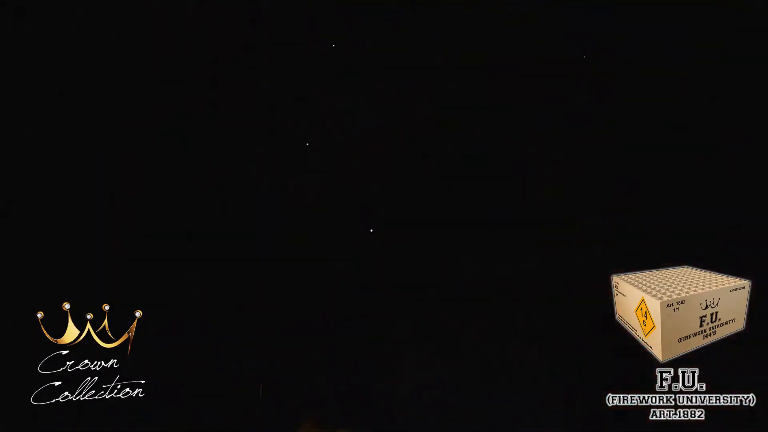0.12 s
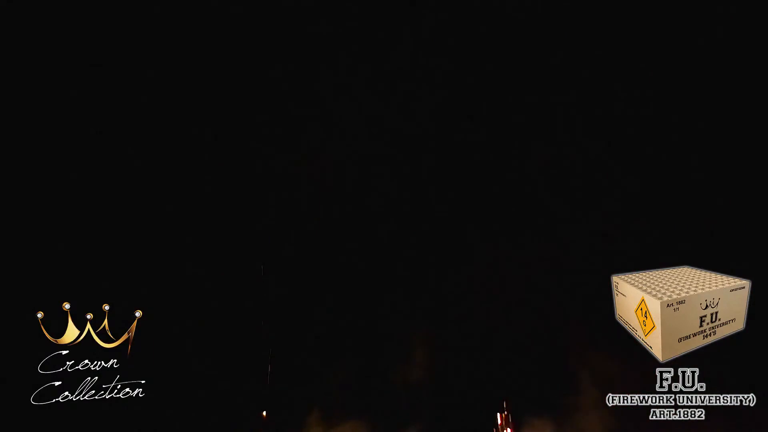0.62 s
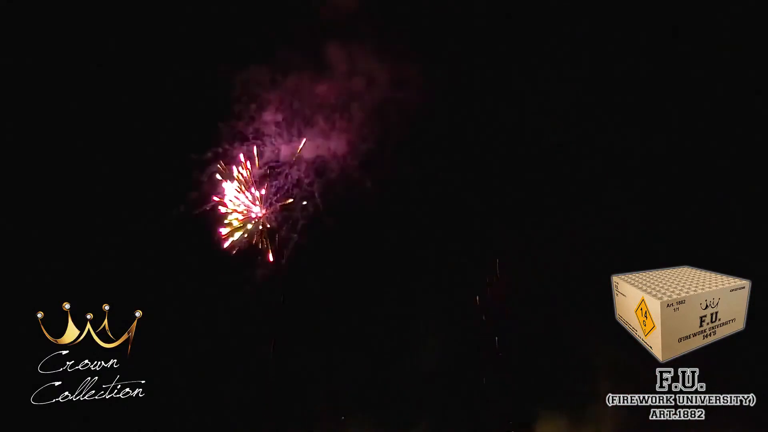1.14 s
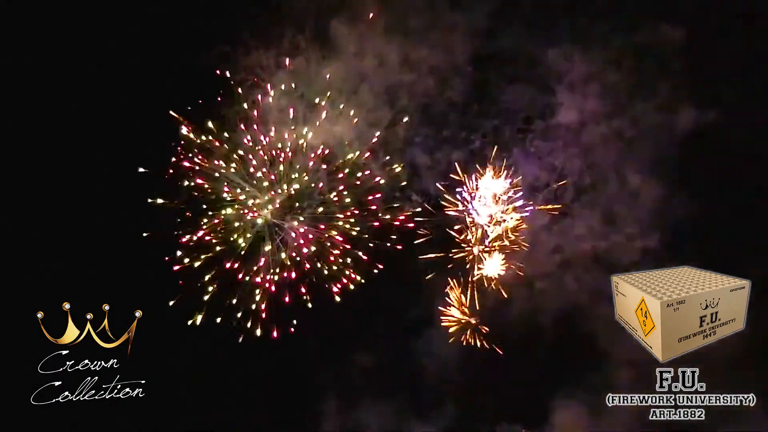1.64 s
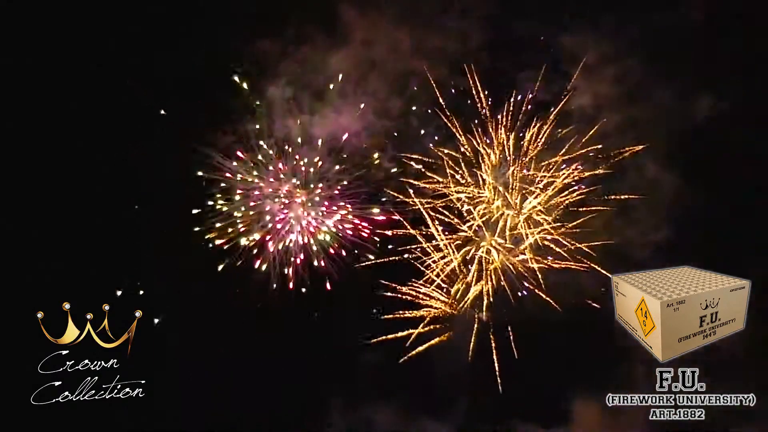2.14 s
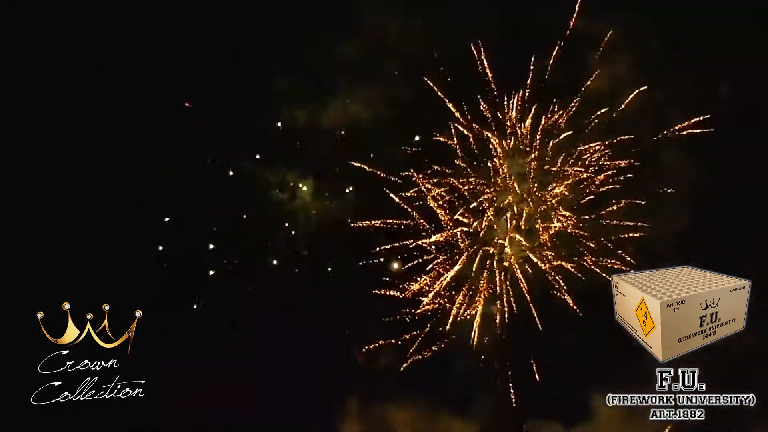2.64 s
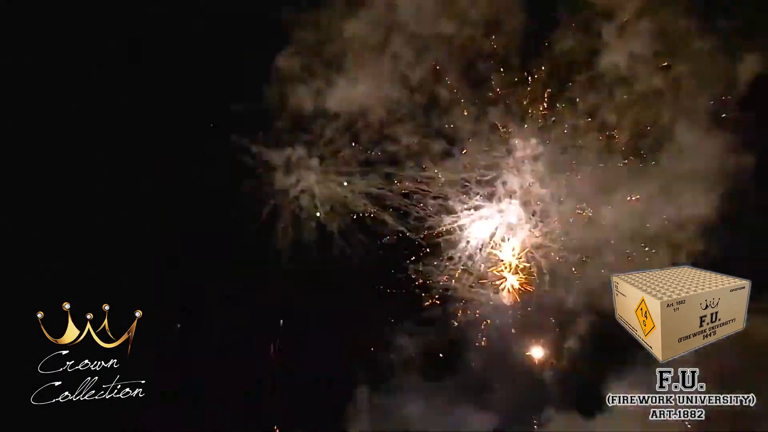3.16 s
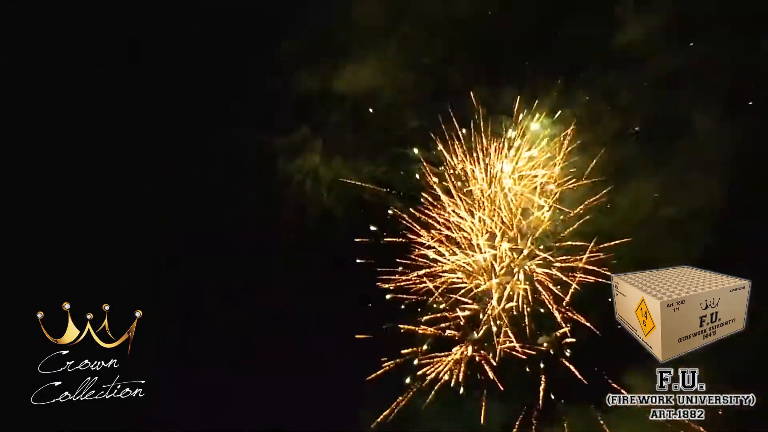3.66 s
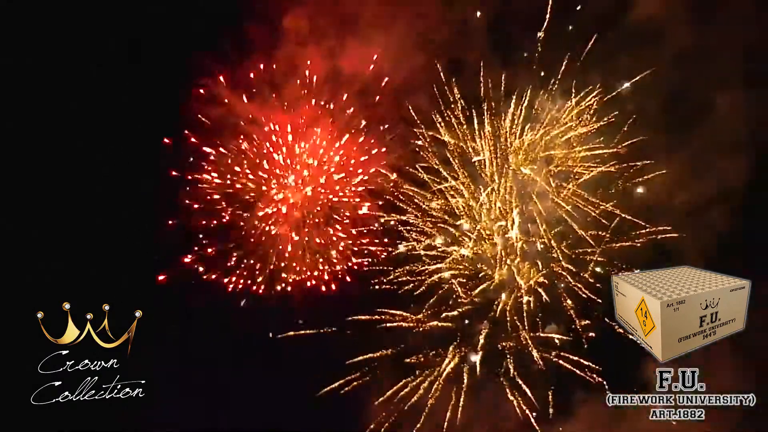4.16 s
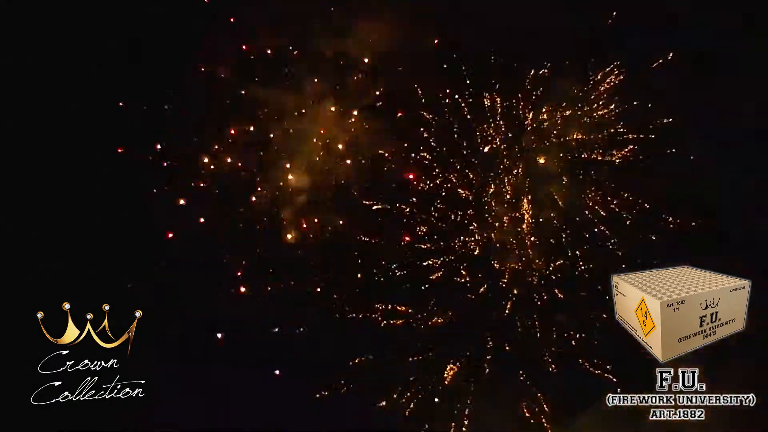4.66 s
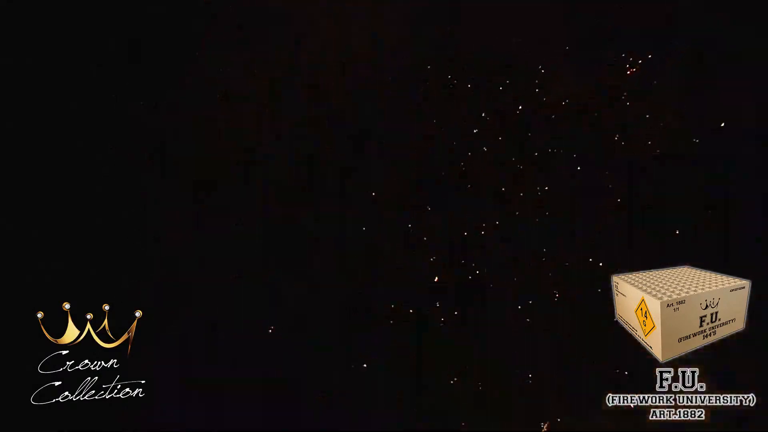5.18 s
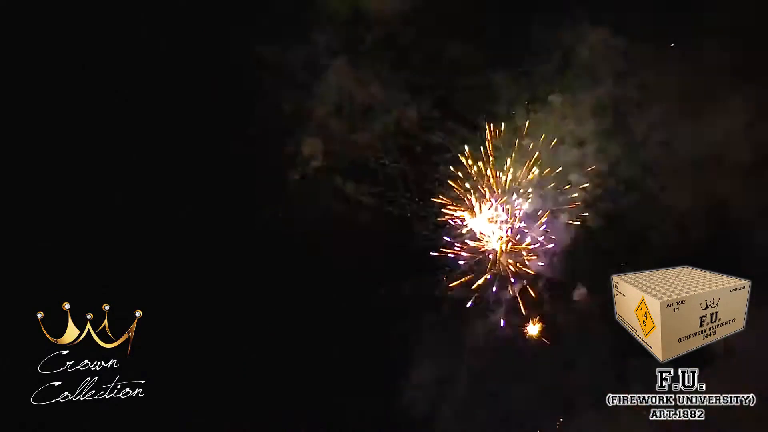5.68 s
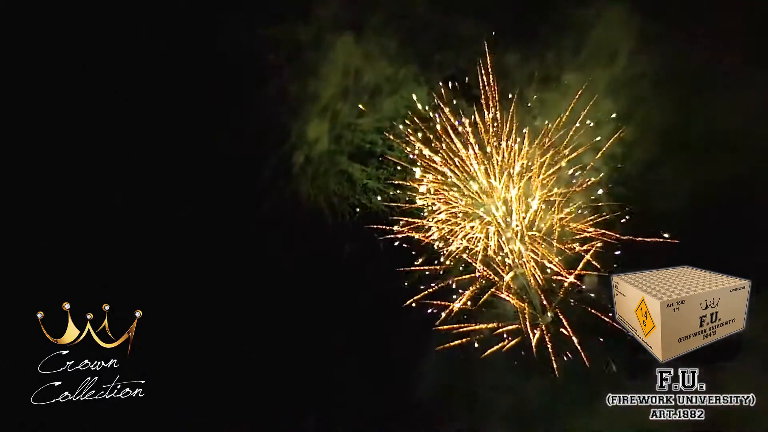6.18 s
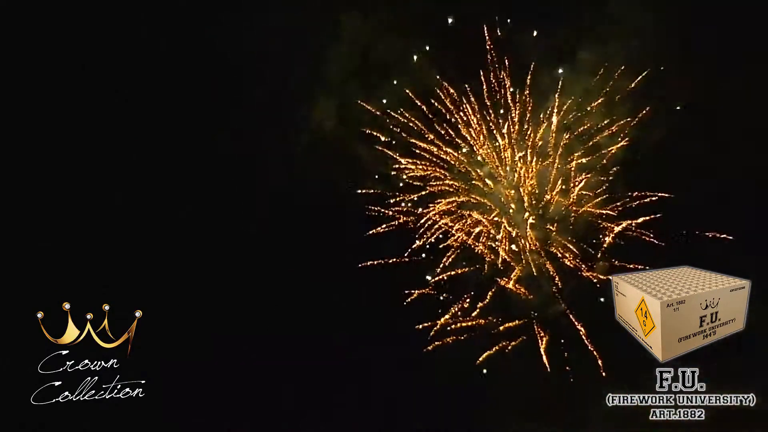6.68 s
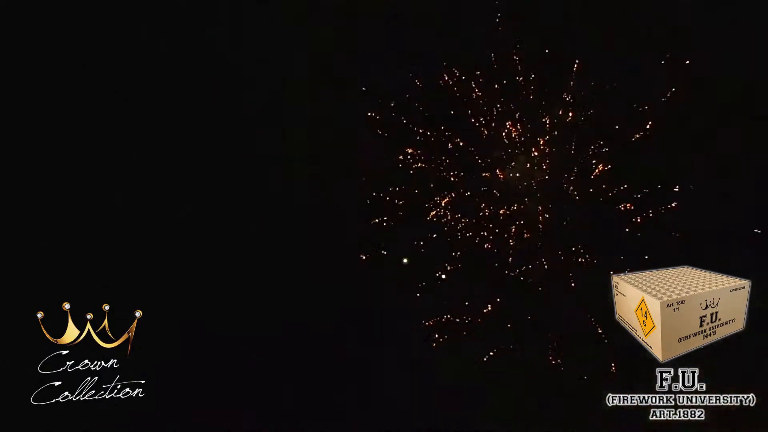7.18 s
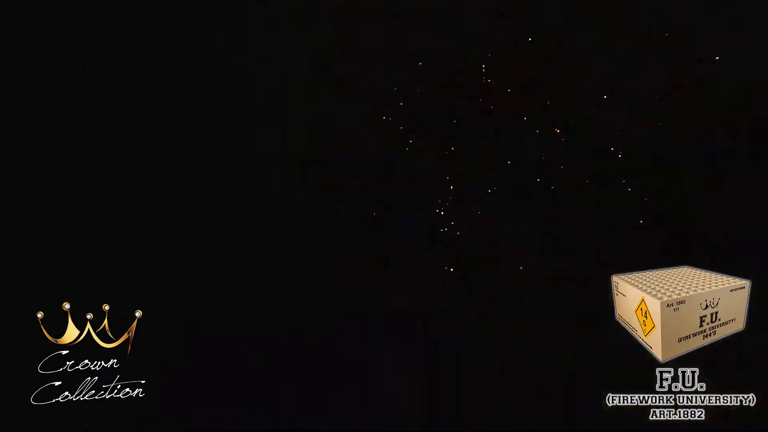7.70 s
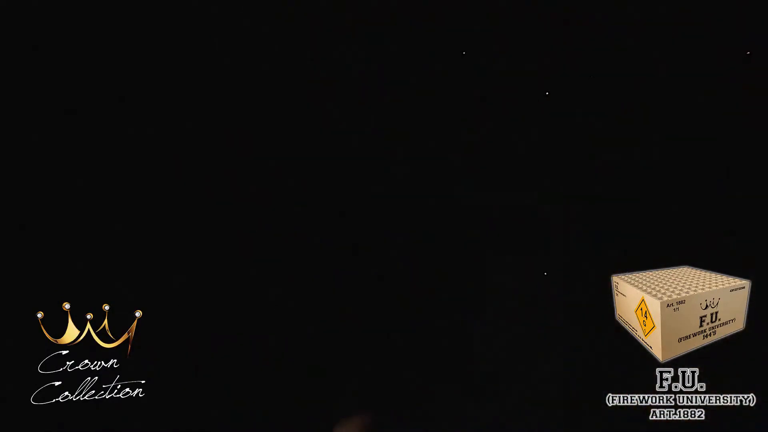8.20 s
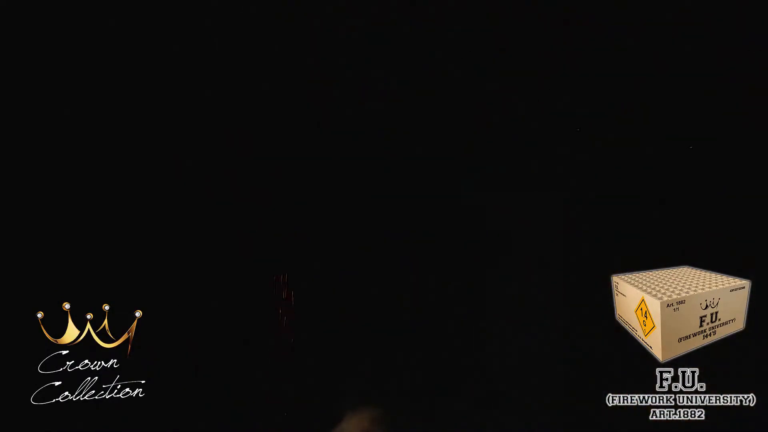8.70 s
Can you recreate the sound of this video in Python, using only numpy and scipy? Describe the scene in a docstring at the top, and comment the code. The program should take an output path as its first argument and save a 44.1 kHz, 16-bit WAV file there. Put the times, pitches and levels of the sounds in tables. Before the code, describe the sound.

Outdoors at night, a firework battery thumps out shells in rapid rows. Seconds later they burst overhead in dense, hard bangs that overload the microphone. Crackling stars follow the first two volleys, and echoes roll off walls and houses. A third volley bangs with hardly any crackle, then rumble fades to faint traffic and breeze before one more row of launches.

```python
"""Firework cake at night

Shells burst overhead, tubes thump as they launch, crackling stars pop; the input overloads on the bangs.
Each bang is a short pressure front followed by damped sine swings.
The ground and walls throw the bangs back as delayed, smeared copies, and the district
rumbles after them in noise bands that decay. Below lie filtered noises for a breeze and distant traffic.
"""
import sys
import numpy as np
from scipy import signal
from scipy.fft import rfft, irfft
from scipy.io import wavfile

SR = 44100
rng = np.random.default_rng(int(sys.argv[2]) if len(sys.argv) > 2 else 0)


def voltage_ratio(decibels):
    """Convert decibels (scalar or array-like) to amplitude ratios, 20 dB per decade."""
    exponent = np.asarray(decibels, float) / 20
    return 10 ** exponent


def to_wav(sig):
    """Store sig (one row per channel, or 1-D mono) as 16-bit WAV at the path in sys.argv[1].

    Samples outside -1..1 are clipped; the rate is SR.
    """
    pcm = np.clip(np.atleast_2d(sig), -1, 1) * 32767
    pcm = np.round(pcm).astype(np.int16)
    wavfile.write(sys.argv[1], SR, pcm.T)  # frames by channels


N = 389403  # samples


def band(x, hz, octaves):
    """Band-pass centred on hz."""
    edges = hz * 2. ** (np.array([-.5, .5]) * octaves)
    return signal.sosfilt(signal.butter(2, edges, "band", fs=SR, output="sos"), x)


def soften(x, hz):
    """Low-pass that dulls everything above hz."""
    return signal.sosfilt(signal.butter(2, hz, fs=SR, output="sos"), x)


def unit(x):
    """Scale to rms 1."""
    return x / np.sqrt(np.mean(x ** 2))


def spikes(start_s, level_db):
    """One impulse for each event."""
    index = np.clip((start_s * SR).astype(int), 0, N - 1)
    return np.bincount(index, voltage_ratio(level_db), N)


def ring(x, modes, front_s, front_db):
    """A short overpressure front, then the air swings back through damped modes."""
    t = np.arange(SR // 2) / SR
    swing = 0
    for hz, level_db, t60_s in modes:
        swing = swing - voltage_ratio(level_db) * np.sin(2 * np.pi * hz * t) * 1000. ** (-t / t60_s)
    front = np.full(max(int(front_s * SR), 1), voltage_ratio(front_db))
    return signal.oaconvolve(x, np.concatenate([front, swing]))[:N]


def fade(power, t60_s, rise_s):
    """Amplitude envelope of energy that arrives, builds up and dies away."""
    decay_pole = 1e6 ** (-1 / (t60_s * SR))
    rise_pole = np.exp(-1 / (rise_s * SR + 1e-9))
    for pole in (decay_pole, rise_pole):
        power = signal.lfilter([1], [1, -pole], power)
    return np.sqrt(np.abs(power) / (1 + rise_s * SR))


def rough_wall(spread_s, dull_hz):
    """Uneven wall: many small reflections swell and thin out, as strong in the bass as one flat wall."""
    t = np.arange(SR // 10) / SR / spread_s
    facets = soften(rng.standard_normal(len(t)) * np.sqrt(t) * np.exp(-t), dull_hz)
    return facets * np.sqrt(2 * dull_hz / SR / np.sum(facets ** 2))


def echo(x, lag_ms, level_db):
    """A late copy smeared by an uneven wall."""
    gap = np.zeros(int(lag_ms / 1000 * SR))
    wall = np.append(gap, voltage_ratio(level_db) * rough_wall(0.0027, 4200))
    return signal.oaconvolve(x, wall)[:N]


# Shell bursts: start_s, level_db, wall_lag_ms (tells how far from the wall the shell burst)
SHELL_BURSTS = [(1.255, 14, 57), (1.4966, 13, 47), (1.557, 18, 57), (1.575, 8.5, 61), (1.7501, 14.5, 24),
                (1.8, 18, 36), (1.826, 4.5, 41), (1.849, 14.5, 34), (1.886, 15, 38), (2.0281, 14.5, 34),
                (2.042, 7, 38), (2.062, 6, 46), (2.079, 12, 24), (2.133, 13.5, 59), (2.155, 10, 58),
                (3.4056, 15, 26), (3.42, 15.5, 24.6), (3.46, 16.5, 30), (3.472, 15.5, 33), (3.515, 13, 26),
                (3.525, 9, 26), (3.5953, 11.5, 43), (3.621, 11, 28), (3.6889, 12.5, 28), (3.7668, 11.5, 38),
                (4.0058, 13.5, 40), (4.025, 3.5, 50), (4.052, 14, 47), (4.1431, 13, 52), (4.237, 17, 41),
                (5.774, 13.5, 33), (5.817, 13.5, 27), (5.8947, 13.5, 49), (5.915, 10.5, 35),
                (5.929, 12.5, 45), (5.949, 12, 21), (6.013, 11.5, 50), (6.044, 10.5, 47), (6.069, 14.5, 37),
                (6.12, 12, 31)]
# Swings of the air after a blast, before each shell's size shifts the pitch: pitch_hz, level_db, t60_s
BLAST_MODES = [(477.6, -1.5, 0.016), (523.4, -17, 0.04), (353, -11.5, 0.029), (660, -1.5, 0.0057),
               (1370, -10.5, 0.0047)]
# Slow heave of air after a blast: pitch_hz, level_db, t60_s
BLAST_HEAVE = [(9.1, -23.5, 0.047)]


def bursts():
    """Each shell's blast comes direct, off the ground, and smeared off a wall; bigger shells swing slower."""
    wall_db, ground_db = -19, -3.5  # relative to the direct blast
    start_s, level_db, wall_ms = np.transpose(SHELL_BURSTS)
    smallness, height = rng.uniform(-1, 1, (len(start_s), 2)).T
    pitch = 1 + 0.09 * smallness
    ground_ms = 5.8 + 0.36 * height
    blast = np.zeros(N + SR)
    span = SR // 3
    for k, start in enumerate((start_s * SR).astype(int)):
        arrivals_s = np.array([0, ground_ms[k] / 1000])
        paths = spikes(arrivals_s, level_db[k] + np.array([0, ground_db]))[:span]
        wall = rough_wall(0.0029, 9300)
        lag = int(wall_ms[k] / 1000 * SR)
        paths[lag:lag + len(wall)] += voltage_ratio(level_db[k] + wall_db) * wall
        modes = [(hz * pitch[k], mode_db, t60_s) for hz, mode_db, t60_s in BLAST_MODES]
        blast[start:start + span] += ring(paths, modes, 0.0003, 0.17)[:span]
    shots = spikes(start_s, level_db)
    scattered = shots + spikes(start_s + wall_ms / 1000, level_db + wall_db)
    return scattered, blast[:N] + ring(shots, BLAST_HEAVE, 0, -56)


# Launches, alone or in rows that a quick fuse lights some 20 ms apart:
# start_s, thump_db (relative), gas_db (the gas that escapes past the shell, relative)
TUBE_LAUNCHES = [(0.168, -2, -8), (0.34, 1.5, -18), (0.421, 10, -13.5), (0.444, 3, -16.5), (0.467, 7, -11),
                 (0.488, -2.5, -9), (0.508, -4, -20), (0.529, 0.5, -20), (0.695, -2, -9), (2.095, 3, -20),
                 (2.112, 3, -8), (2.12, 3, -10), (2.146, 5.5, -14), (2.168, 4, -11), (2.187, -7, -17),
                 (2.671, 1, -17), (2.693, 4, -6), (2.71, 3, -19), (2.729, 0, -22), (2.75, -2, -14),
                 (2.77, -6.5, -28), (2.806, -5.5, -25), (4.38, 3, -17), (4.402, 3, -17), (4.432, 7.5, -23),
                 (4.453, -2, -13), (4.471, 8.5, -33), (4.483, -8, -10), (4.504, -8, -10), (8.029, 4.5, -7),
                 (8.048, 9.5, -9), (8.06, -6, -3), (8.067, -2, -9), (8.084, 6.5, -12), (8.088, -7, -7),
                 (8.103, 6.5, -16), (8.124, 3.5, -26), (8.131, -19, -24), (8.152, 3.5, -4.5),
                 (8.171, 1.5, -23)]
# Tone of the tube: pitch_hz, level_db, t60_s
TUBE_MODES = [(242, 0.5, 0.015), (338.4, -9, 0.06)]
# Slow heave of air at the muzzle: pitch_hz, level_db, t60_s
MUZZLE_HEAVE = [(22.6, -9.5, 0.087)]
# Tones of the wall's answer and the humming yard, before band-passing: pitch_hz, level_db, t60_s
YARD_MODES = [(350, -17, .15), (305, -20, .13), (275, -33, .4), (330, -32, .55), (380, -32, .5)]


def launches():
    """The tube thumps after a short hiss of gas; a wall answers with the tube's tone and the yard hums on."""
    start_s, thump_db, gas_db = np.transpose(TUBE_LAUNCHES)
    shots = spikes(start_s + 0.000833, thump_db + 2.0)
    # the answer at 0.02 s is to an earlier shot
    walls = spikes(np.append(start_s + 0.039, 0.02), np.append(thump_db, -2.5))
    jet_shape = fade(spikes(start_s - 0.0015, gas_db) ** 2, 0.008, rise_s=0.0016)
    jet = jet_shape * unit(band(rng.standard_normal(N), 4940, 1.22))
    thump = ring(shots, TUBE_MODES, 0.00033, 5.2) - ring(shots, MUZZLE_HEAVE, 0, -53)
    hum = ring(walls, YARD_MODES, 0, -60)
    answer = band(band(hum, 340, 0.7), 340, 0.85)  # narrow, so it swells in
    sharp_part = band(thump + jet, 2230, 2.9)
    slap = echo(sharp_part, lag_ms=52, level_db=-24)
    scattered = shots + voltage_ratio(-8.5) * walls
    return scattered, thump + answer + jet + slap


# Lone stars popping: start_s, level_db
LONE_POPS = [(2.2782, -14), (2.3031, -11), (2.322, -20), (2.3603, -8), (2.3806, -12), (2.465, -5.5),
             (2.5135, -6), (2.5295, -7), (2.822, -7), (2.8488, 1), (2.9204, 0), (2.9236, -5), (2.9651, -2),
             (2.9798, -6), (3.0078, -1.5), (3.2072, -2), (4.7342, -7), (4.7473, -1.5), (4.763, -1.5),
             (4.788, 3), (4.8043, 0.5), (4.8222, -3), (5.21, -30), (7.709, -29), (7.754, -25), (7.906, -24)]
# Swarms of crackling stars: start_s, build_up_s, thin_out_s,
# start_pops_per_s, densest_pops_per_s, end_pops_per_s
STAR_SWARMS = [(2.535, .12, .17, 300, 750, 300), (4.15, .25, .222, 90, 850, 450),
               (4.63, .02, .017, 100, 218, 250), (4.682, .011, .012, 350, 250, 350)]
# Swings of the air after a pop: pitch_hz, level_db, t60_s
STAR_MODES = [(3080, 10.5, 0.00024), (1380, -12, 0.0025)]


def stars():
    """Single pops and random swarms, each with a duller echo off the ground and a faint one off a wall."""
    loudest_db, spread_db = -0.5, 4.5  # swarm pops fall below the loudest by spread_db on average
    start_s, level_db = np.transpose(LONE_POPS)
    timing, loudness, height = rng.random((3, N))
    t = np.arange(N) / SR
    rate = 0
    for swarm_s, up_s, down_s, *per_s in STAR_SWARMS:
        rate = rate + np.interp(t, np.cumsum([swarm_s, up_s, down_s]), per_s, 0, 0)
    hit = np.flatnonzero(timing < rate / SR)
    start_s = np.append(start_s, hit / SR)
    level_db = np.append(level_db, loudest_db + spread_db * np.log(loudness[hit]))
    # ground lag from the lowest to the highest stars
    ground_ms = np.interp(height[(start_s * SR).astype(int)], [0, 1], [3.5, 6.5])
    shots = spikes(start_s, level_db)
    ground = spikes(start_s + ground_ms / 1000, level_db - 6)
    pops = ring(soften(shots, 6400) + soften(ground, 4200), STAR_MODES, 0.00012, -0.79)
    return shots, pops + echo(pops, lag_ms=49, level_db=-19)


# Scattered returns by octave: centre_hz, after_launch_db, after_burst_db, after_pop_db,
# near_t60_s, far_db (relative to near), far_t60_s
SCATTER = [(39.7, -22.5, -26, -47, 0.072, -24, 0.89), (94, -22.5, -30, -56, 0.17, -33, 3),
           (171, -21.5, -29.5, -44.5, 0.22, -30.5, 1.8), (345.6, -29, -27.5, -46, 0.34, -20.5, 1.64),
           (489, -36.5, -29, -39.5, 0.23, -8.5, 0.71), (1000, -30.5, -23.5, -33.5, 0.067, -40, 0.8),
           (1390, -49.5, -40.5, -51, 0.5, -38.5, 4.4), (2690, -39.5, -32.5, -40, 0.17, -27, 2.97),
           (5070, -41, -37.5, -45.5, 0.12, -17, 1.81), (8400, -51.5, -40, -44, 0.12, -38, 0.44)]


def returns(launch_shots, burst_shots, pop_shots):
    """Trees, houses and far hills scatter every bang into a short and a long rough tail."""
    shots = (launch_shots, burst_shots, pop_shots)
    tails = 0
    for hz, *levels_db, near_t60_s, far_db, far_t60_s in SCATTER:
        power = sum((voltage_ratio(level_db) * x) ** 2 for level_db, x in zip(levels_db, shots))
        near = fade(power, near_t60_s, rise_s=0.00043)
        far = voltage_ratio(far_db) * fade(power, far_t60_s, rise_s=0.016)
        tails = tails + (near + far) * unit(band(rng.standard_normal(N), hz, 0.88))
    return tails


# Tone colour of the night air: pitch_hz, density_db (per Hz, relative)
NIGHT_COLOUR = [(12, -7), (20, 0), (62, -8.5), (120, -21), (159, -24), (200, -24), (615, -25.5), (681, -30),
                (902, -36), (1620, -36.5), (4630, -52), (9000, -65.5), (11700, -109), (19800, -120)]
# Slow level moves: time_s, traffic_db, breeze_db
NIGHT_MOVES = [(0, -37.5, -35), (1.0, -41.5, -40.5), (2.4, -41.5, -32), (4.9, -41.5, -33),
               (5.4, -38.5, -41), (6.3, -35, -43), (7.1, -42.5, -34.5), (7.85, -36, -34), (8.83, -43, -39)]


def night():
    """Far traffic with a band of tyre hiss; a breeze rumbles unevenly below it."""
    colour_hz, density_db = np.transpose(NIGHT_COLOUR)
    f = np.fft.rfftfreq(N, 1 / SR)
    colour = voltage_ratio(np.interp(np.log(f + 1), np.log(colour_hz), density_db))
    air = irfft(rfft(rng.standard_normal(N)) * colour, N)
    low = soften(air, 224)
    time_s, *columns = np.transpose(NIGHT_MOVES)
    traffic_db, breeze_db = (np.interp(np.arange(N) / SR, time_s, column) for column in columns)
    gust_db = 1.8 * unit(soften(rng.standard_normal(N), 4))
    tyres = voltage_ratio(-18.5) * unit(band(rng.standard_normal(N), 1490, 0.18))
    traffic = voltage_ratio(traffic_db) * (unit(air - low) + tyres)
    breeze = voltage_ratio(breeze_db + gust_db) * unit(low)
    return traffic + breeze


def scene():
    """All sources reach the two close microphone ports alike."""
    launch_shots, launch_sound = launches()
    burst_shots, burst_sound = bursts()
    pop_shots, pop_sound = stars()
    bangs = launch_sound + burst_sound + pop_sound
    mix = bangs + returns(launch_shots, burst_shots, pop_shots) + night()
    return np.tile(mix, (2, 1))


def band_limit(x):
    """A steep low-pass at the top of the band."""
    return signal.sosfilt(signal.butter(12, 16980, fs=SR, output="sos"), x)


def record(dry):
    """The input flattens the bangs and its coupling capacitor lets the flat tops sag. Apart from that, left and
    right differ by a faint flicker, mostly treble."""
    clip_level, hardness = 0.57, 6
    x = dry + voltage_ratio(-12) * band(dry, 4880, 0.28)  # cavity in front of the capsule
    x = x / (1 + np.abs(x / clip_level) ** hardness) ** (1 / hardness)
    x = signal.sosfilt(signal.butter(1, 5, "high", fs=SR, output="sos"), x)  # coupling capacitor
    x = signal.sosfilt(signal.ellip(8, 0.2, 70, 15700, fs=SR, output="sos"), x)  # steep top limit
    # a faint flickering difference, mostly treble, goes to left and right in opposite polarity
    flutter = unit(soften(rng.standard_normal(N), 41))
    treble = np.gradient(np.gradient(x[0]))
    unlike = flutter * (voltage_ratio(-40.5) * x[0] + voltage_ratio(-21.5) * treble)
    return band_limit(x + unlike * np.array([[1], [-1]]))


dry = scene()
out = record(dry)
to_wav(out)
```